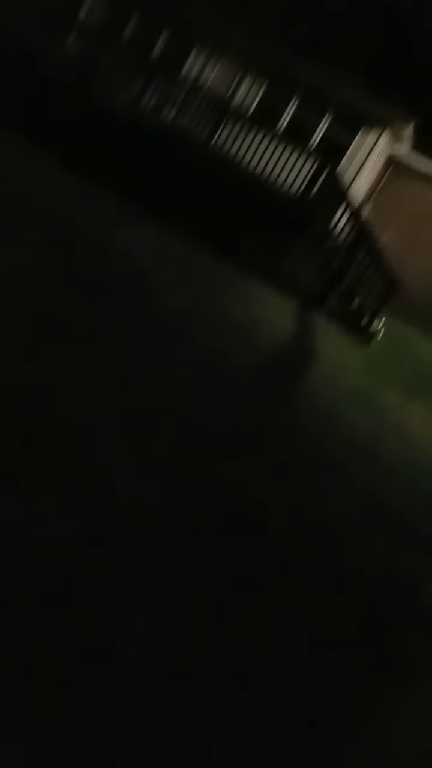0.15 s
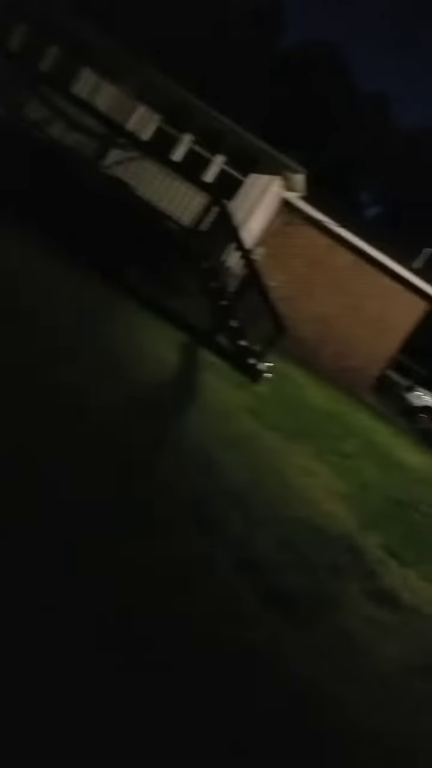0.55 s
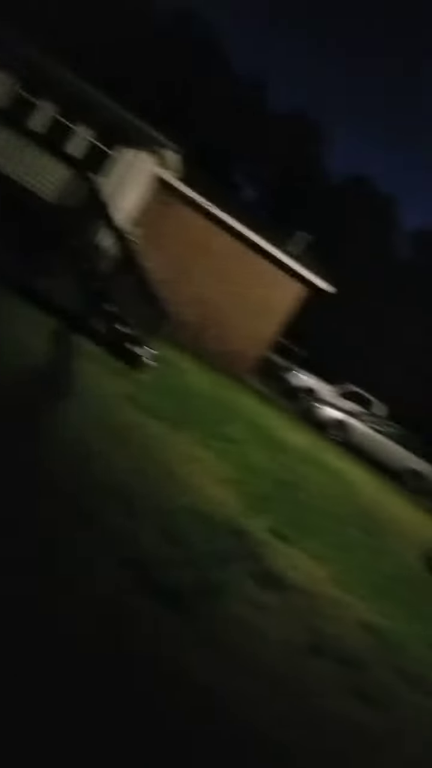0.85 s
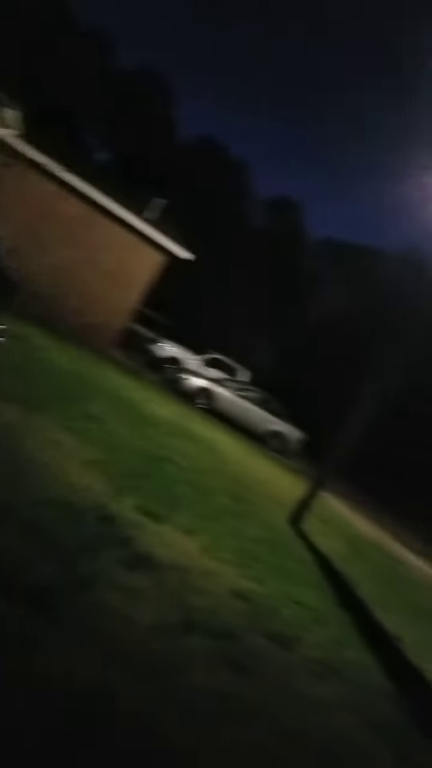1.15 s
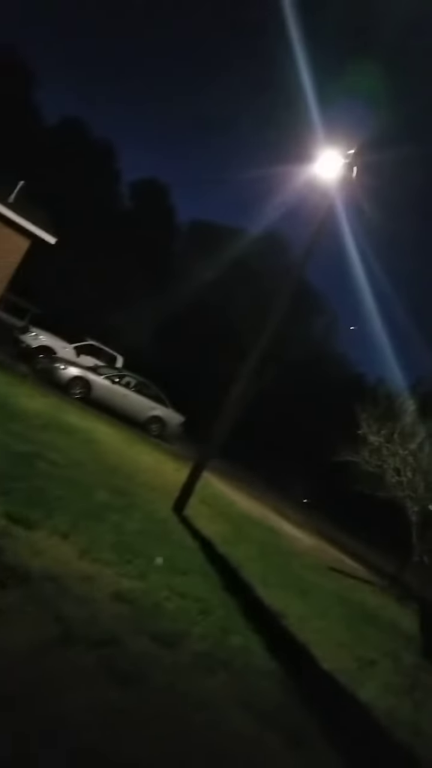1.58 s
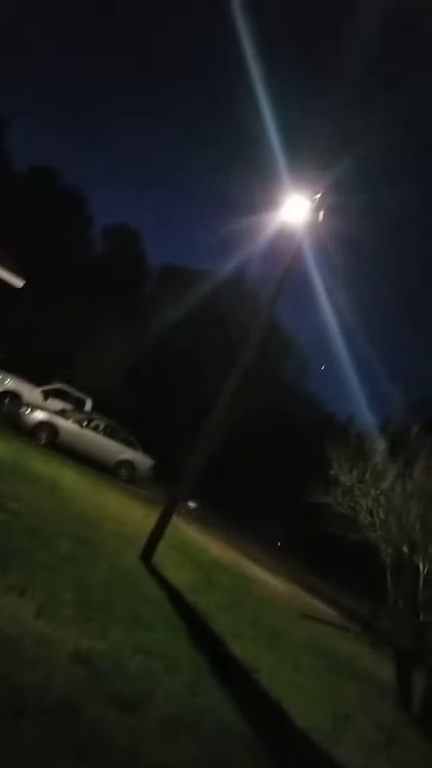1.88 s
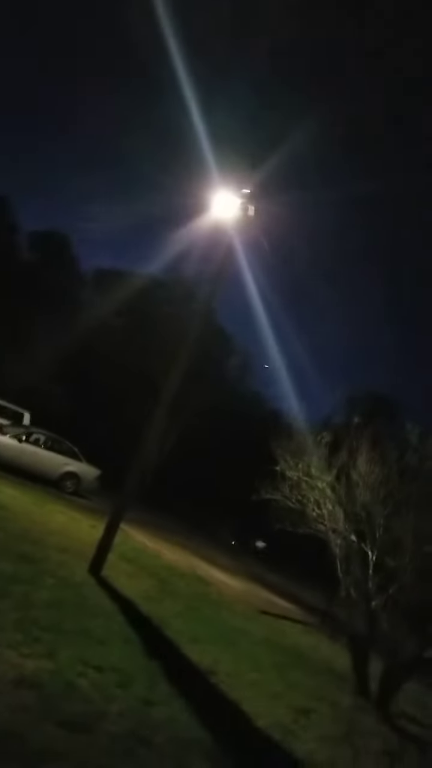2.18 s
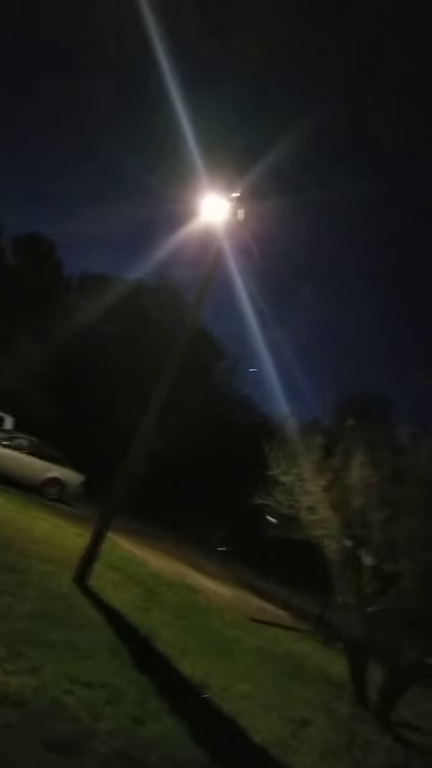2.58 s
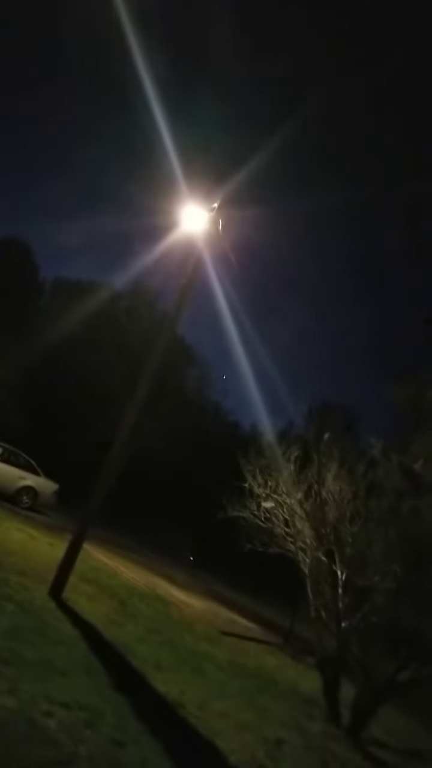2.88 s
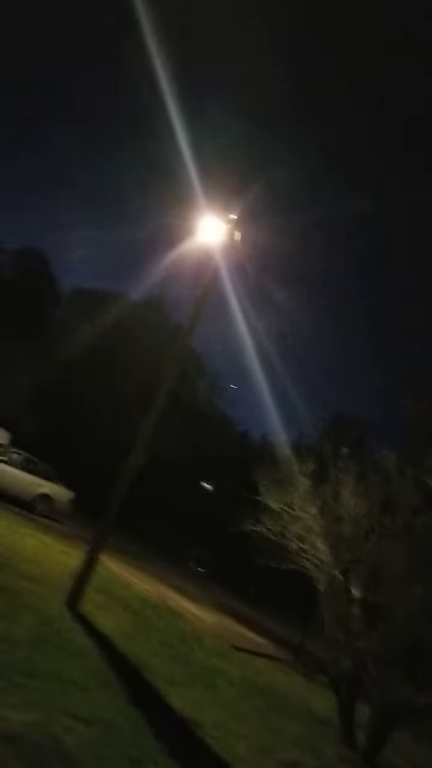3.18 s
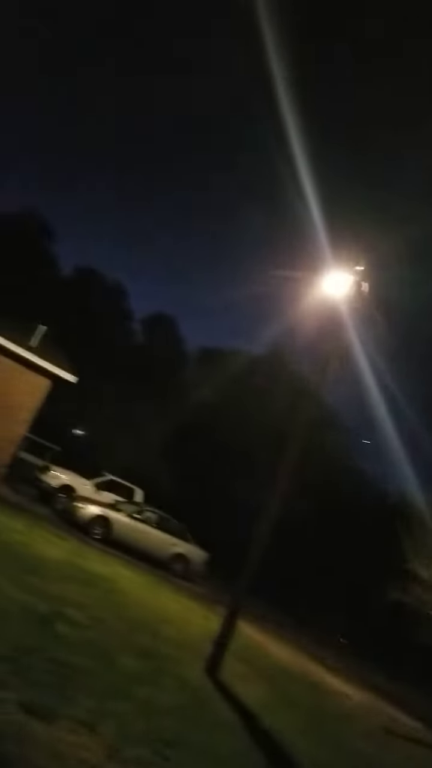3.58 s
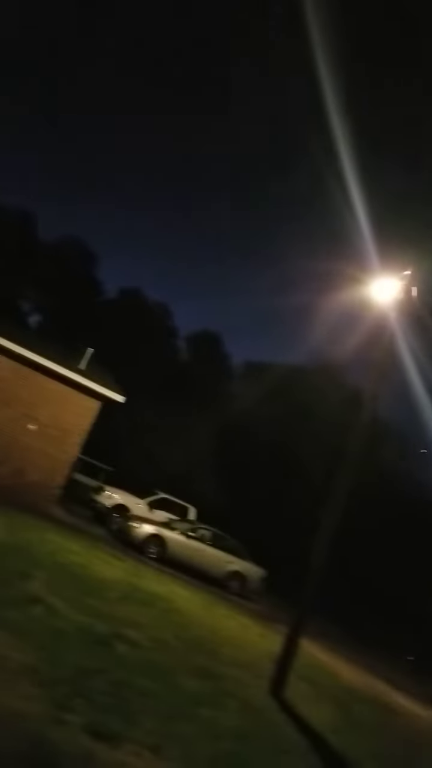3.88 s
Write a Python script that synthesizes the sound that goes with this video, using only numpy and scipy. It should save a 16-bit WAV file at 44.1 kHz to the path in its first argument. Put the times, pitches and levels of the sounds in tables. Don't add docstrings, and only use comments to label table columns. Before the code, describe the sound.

Four pure, gliding nightjar songs ring over a grassy yard beside a house, each trailing echoes into the next. Close cloth rubbing, taps and dull bumps on the swung phone crowd the first half, then thin out. Distant traffic and a hidden engine idle underneath. Near the end a far frog peeps weakly and another bird answers with a short note.

```python
import sys
import numpy as np
from scipy import signal
from scipy.fft import rfft, irfft, next_fast_len
from scipy.io import wavfile
from scipy.ndimage import uniform_filter1d, map_coordinates

SR = 44100
rng = np.random.default_rng(int(sys.argv[2]) if len(sys.argv) > 2 else 0)


def nominal_scale(level):
    x = np.asarray(level, float) / 20
    return 10 ** x


def persist_wave(psi):
    counts = np.round(np.clip(psi, -1, 1) * 32767).astype(np.int16)
    wavfile.write(sys.argv[1], SR, np.atleast_2d(counts).T)


N = 178252
LEAD_IN = 2 * SR


def along(points, hz):
    point_hz, value = np.transpose(points)
    return np.interp(np.log(hz + 1), np.log(point_hz + 1), value)


def curves(rows):
    s, *columns = np.transpose(rows)
    return [np.interp(np.arange(N) / SR, s, column) for column in columns]


def unit(x):
    return x / np.sqrt(np.mean(x ** 2) + 1e-20)


def wobble(rate_hz):
    knots = rng.standard_normal(int(N * rate_hz / SR) + 4)
    return map_coordinates(knots, [np.arange(N) * rate_hz / SR])


def filtered(x, response):
    m = next_fast_len(x.shape[-1] + 8192)
    spectrum = rfft(x, m) * response(np.fft.rfftfreq(m, 1 / SR))
    return irfft(spectrum, m)[..., :x.shape[-1]]


def sides(db):
    return np.array([nominal_scale(db / 2), nominal_scale(-db / 2)])


def add(track, x, start_s):
    part = track[:, LEAD_IN + round(start_s * SR):][:, :x.shape[1]]
    part += x[:, :part.shape[1]]


def rush(colour, alike, patchy_db):
    z = signal.stft(rng.standard_normal((2, N)), nperseg=512)[2]
    field = uniform_filter1d(rng.standard_normal(z.shape[1:]), size=6, axis=0)
    field = uniform_filter1d(field, size=10, axis=1)
    pair = signal.istft(z * nominal_scale(patchy_db * unit(field)), nperseg=512)[1][:, :N]

    def mid_side(hz):
        angle = np.arccos(np.clip(along(alike, hz), -1, 1)) / 2
        return nominal_scale(along(colour, hz)) * [np.cos(angle), np.sin(angle)]

    mid, side = filtered(pair, mid_side)
    return unit(np.array([mid + side, mid - side]))


def night():
    # s, level_db
    drone_level = [(0, -68), (.9, -65), (2.04, -65.5), (2.9, -70.5), (3.31, -67.5), (4.04, -71)]
    # hz, db_per_hz
    drone_colour = [(15, -47), (25, -19), (54, -4.5), (118, -4.5), (178, -11.5), (232, -13), (417, -24),
                    (525, -21.5), (753, -22), (1250, -23), (1620, -60), (2750, -120)]
    # hz, left-right likeness [0-1]
    drone_alike = [(60, 0.84), (130, 0.77), (300, 0.59), (700, 0.69), (1300, 0.3)]
    # hz, left_right_db
    drone_tilt = [(60, -0.5), (180, 0.5), (550, 6), (1650, -3), (4970, 0.0), (15000, 3)]
    # hz, db_per_hz
    hiss_colour = [(1940, -32), (3300, -0.5), (5750, 0.5), (6460, -2), (8070, -1.5), (8730, -4),
                   (9690, -3.5), (12300, 1.5), (15700, -2)]
    drone = rush(drone_colour, drone_alike, patchy_db=1.5)
    drone = filtered(drone, lambda hz: sides(along(drone_tilt, hz)))
    hiss = rush([(300, 5.2), (2000, 1.7)] + hiss_colour[1:], [(1000, 0)], patchy_db=-0.7)
    hiss_db = -74
    return nominal_scale(curves(drone_level)[0] + 7.5) * drone + nominal_scale(hiss_db) * hiss


def engine():
    # even_firing_db, gain_when_uneven_db
    orders = [
        (-56, -12),
        (-80, 19),
        (-62, -4),
        (-75, 14),
    ]
    # s, unevenness [0-1]
    unevenness = [(0, .3), (.17, .05), (.65, .95), (1.22, .9), (1.5, .65), (1.7, .6), (2.0, .05),
                  (2.7, .25), (3.15, .55), (3.3, .05), (4.04, .3)]
    firing_hz = 29.08
    turns = np.cumsum(firing_hz * (1 + .012 * wobble(3))) / SR
    uneven, = curves(unevenness)
    hum = np.zeros((2, N))
    for order, (even_db, gained_db) in enumerate(orders, start=2):
        drift_rad = 0.39 * wobble(7.9) + 0.3 * np.array([wobble(3.8), wobble(4.1)])
        level_db = even_db + gained_db * uneven + 2.03 * wobble(12)
        hum += nominal_scale(level_db) * np.sin(2 * np.pi * order * turns + drift_rad)
    return hum


def strokes():
    # top_s, top_db, rise_s, fall_s (both per 10 dB), left_right_db
    rustles = [(.02, -65, .1, .1, 2.2), (.07, -55, .008, .015, -9), (.15, -61.5, .06, .09, -2.5),
               (.34, -66, .08, .02, -3), (.45, -68.5, .2, .9, 2.2), (.9, -62, .12, .08, -6),
               (.99, -65, .015, .09, -6.5), (1.22, -67, .02, .13, -11), (1.39, -69, .04, .08, -9),
               (1.5, -70, .15, .11, -5.5), (1.82, -75, .08, .14, -11), (2.47, -77, .4, .2, -9),
               (3.27, -61.5, .12, .16, .8)]
    t = np.arange(N) / SR
    each = []
    for top_s, db, rise_s, fall_s, pan_db in rustles:
        drop_db = 10 * np.maximum((top_s - t) / rise_s, (t - top_s) / fall_s)
        each.append(nominal_scale(db - drop_db) * sides(pan_db)[:, None])
    return np.linalg.norm(each, axis=0)


def sleeve():
    # hz, db_per_hz
    cloth_colour = [(1940, -37), (3300, -7), (3860, -8), (4630, -4), (5560, -6.5), (6460, -3), (8120, -16),
                    (9440, -8.5), (11200, -7.5), (12100, -17.5), (14100, -19), (15000, -11.5), (15700, -12)]
    # hz, db_per_hz
    cloth_low = [(200, -3.5), (700, 2.5), (2000, 3)]
    # hz, left_right_db
    cloth_tilt = [(60, -11), (120, -6), (240, 0.0), (480, 2.0), (950, 1.5), (1890, 7.5), (3770, 15.5),
                  (7520, -7), (15000, -5.5)]
    fibres = nominal_scale(0.5 * wobble(29.25) + 1.4 * wobble(300))
    weave = rush(cloth_low + cloth_colour[1:], [(300, 1.0), (3000, 0.041)], patchy_db=2.6)
    weave = filtered(weave, lambda hz: sides(along(cloth_tilt, hz)))
    return nominal_scale(6.0) * strokes() * unit(fibres * weave)


def finger_clicks():
    # s, peak_db, ring_hz, tick_db, left_right_db
    clicks = [
        (0.0645, -27, 1330, -32, -16),
        (.0685, -49.5, 500, 6, -19),
        (.116, -46, 253, -24, -5),
        (0.1534, -45, 2500, -11, -3),
        (.683, -51.5, 900, -27, -25),
        (0.974, -64, 2480, 9, 0),
        (1.203, -49.5, 875, -18, -19),
        (1.2077, -34.5, 1300, -14, -16),
    ]
    t = np.arange(SR // 50) / SR
    track = np.zeros((2, N + LEAD_IN))
    for s, db, ring_hz, tick_db, pan_db in clicks:
        snap = 1.71 * np.sin(2 * np.pi * ring_hz * t) * nominal_scale(-16 * ring_hz * t)
        thud = 0.16 * np.sin(2 * np.pi * 270 * t) * nominal_scale(-60 * t / 0.028)
        grit = uniform_filter1d(rng.standard_normal(len(t)), size=5)
        tick = np.sin(2 * np.pi * 10700 * t) + grit
        tick *= nominal_scale(tick_db + 5 - 60 * t / 0.0039) * (1 - np.exp(-t / .0003))
        add(track, nominal_scale(db) * sides(pan_db)[:, None] * (snap + thud + tick), s)
    return track[:, LEAD_IN:]


def grip():
    # s, peak_db, left_right_db, pitch_hz
    bumps = [
        (0.07, -49, -21, 110),
        (0.578, -55, -22, 110),
        (0.778, -51, -20, 110),
        (0.889, -52, -21, 114),
        (1.029, -58, -14, 109),
        (1.277, -51, -26, 111),
        (1.449, -42.5, -20, 110),
        (1.628, -47, -10, 109),
        (1.88, -46, -26, 108),
        (3.449, -55, -31, 107),
    ]
    t = np.arange(SR // 10) / SR
    track = np.zeros((2, N + LEAD_IN))
    for s, db, pan_db, hz in bumps:
        push = np.sin(2 * np.pi * hz * t) * nominal_scale(-12 * hz * t) * (1 - np.exp(-t / 0.00043))
        add(track, nominal_scale(db - 2.5) * sides(pan_db)[:, None] * push, s)
    return track[:, LEAD_IN:]


def whistle(contour, t, db, warble_depth_hz=0):
    s, hz = np.transpose(contour)[:2]
    warble_hz = 79.9
    pitch_hz = np.interp(t, s, hz) + warble_depth_hz * np.cos(2 * np.pi * warble_hz * (t - .421))
    gate = np.clip(np.minimum((t - s[0]) / .0035, (s[-1] - t) / .008), 0, 1)
    return gate * nominal_scale(db + 3.5) * np.sin(2 * np.pi * np.cumsum(pitch_hz) / SR)


def scatter(t60_s, alike):
    # delay_s, level_db
    walls = [
        (0.051, -8.5),
        (0.073, -10.5),
        (0.109, -21.5),
        (.17, -25),
    ]
    t = np.arange(2 * SR) / SR
    shared, left, right = rng.standard_normal((3, len(t)))
    swell = nominal_scale(-60 * t / t60_s) + 1.15 * nominal_scale(-60 * t / .5)
    path = alike * shared + (1 - alike) * np.array([left, right])
    path = path * swell * np.clip(t / 0.015, 0, 1)
    path /= np.linalg.norm(path[0])
    for delay_s, db in walls:
        path[:, round((delay_s + rng.uniform(0, .004)) * SR)] += nominal_scale(db + rng.normal(0, 1.5, size=2))
    return path


def outdoors(direct, sung, t60_s, alike, lead_rad):
    # hz, db
    echo_colour = [(1350, 4.5), (1850, -4), (2100, -2.2), (2800, 1.3)]
    # hz, left_lead_rad
    port_lead = [(1300, 0.7), (2000, 2.47), (2800, 5.11), (3600, 4.4)]
    # hz, left_right_db
    port_tilt = [(1300, -1.5), (1700, -2), (2100, -8.5), (2800, -1.5), (3600, 1.5)]
    sent = filtered(sung, lambda hz: nominal_scale(along(echo_colour, hz)))
    here = signal.fftconvolve(sent[None], scatter(t60_s, alike), axes=1)
    there = signal.fftconvolve(sent[None], scatter(t60_s, alike), axes=1)
    swing_rad = 1.17 * wobble(12)[:here.shape[1]]
    sound = np.cos(swing_rad) * here + np.sin(swing_rad) * there
    sound[:, :len(sung)] += direct

    def ports(hz):
        half = np.exp(.5j * (along(port_lead, hz) + lead_rad))
        return sides(along(port_tilt, hz)) * [half, 1 / half]

    return filtered(sound, ports)


def nightjar():
    # start_s, echo_db, left_lead_rad
    songs = [
        (-1.73, -7, .1),
        (-.8, -3, .11),
        (.135, -3.5, .75),
        (1.063, -3.5, .55),
        (1.987, -3, .13),
        (2.928, -3.5, .089),
    ]
    # s_after_start, pitch_hz
    whip = [(0, 1570), (.006, 1625), (.03, 1755), (.055, 1840), (.075, 1860), (.108, 1775)]
    poor = [(.232, 1320), (.289, 1430), (.312, 1610), (.332, 1685), (.35, 1510), (.368, 1530), (.388, 1700),
            (.402, 1660)]
    will = [(.418, 1880), (.45, 2310), (.466, 2840), (.478, 2390), (.49, 2130), (.502, 2050), (.527, 1980),
            (.543, 1720)]
    # s_after_start, level_db
    effort = [(.01, -52.5), (.055, -42.5), (.1, -42), (.235, -66), (.3, -48.5), (.43, -42.5), (.466, -48.3),
              (.49, -40), (.54, -47)]
    # s_after_start, dip_db
    catches = [(.289, -7), (.345, -6), (.372, -4), (.408, -6)]
    # s, direct_gain_db, left_right_db
    facing = [(.2, -1.5, 8), (.45, -3, 3), (.525, 3, 2.2), (.63, -10, 4), (.665, .4, -7), (1.075, 3, -7),
              (1.13, -1.5, 3), (1.38, .4, 6), (1.46, 1.6, .3), (2.04, 2.6, -1.2), (2.26, 1.5, 6),
              (2.39, 1.5, .2), (2.5, 4, -1.2), (2.95, 4, -.4), (3.17, 1.2, 12), (3.26, 2.2, .2),
              (3.42, 6, -2.2), (3.46, -3, -1.2)]
    t = np.arange(SR * 6 // 10) / SR
    track = np.zeros((2, N + LEAD_IN))
    db = np.interp(t, *np.transpose(effort))
    for s, dip_db in catches:
        db = db + dip_db * np.clip(1 - abs(t - s) / .008, 0, 1)
    warble_depth_hz = 155 * np.interp(t, [.398, .418, .45, .466], [0, 1, 1, 0])
    sung = whistle(whip, t, db) + whistle(poor + will, t, db, warble_depth_hz)
    when_s, gain_db, pan_db = np.transpose(facing)
    for s, echo_db, lead_rad in songs:
        fading_db = 2.3 * wobble(59.4) + 2.4 * np.array([wobble(44.8), wobble(44.5)])
        gain = nominal_scale(np.interp(s + t, when_s, gain_db) + fading_db[:, :len(t)])
        gain = gain * sides(np.interp(s + t, when_s, pan_db))
        heard = outdoors(gain * sung, nominal_scale(echo_db) * sung, t60_s=2.81, alike=0.39, lead_rad=lead_rad)
        add(track, heard, s)
    return track[:, LEAD_IN:]


def far_callers():
    # start_s, level_db
    answers = [
        (.318, -53.5),
        (3.558, -50),
    ]
    # s_after_start, pitch_hz, level_db
    answer = [(0, 2580, -4), (.015, 2820, -1.5), (.031, 3140, -4), (.043, 2600, 2.5), (.064, 2080, -12)]
    # start_s, length_s, first_hz, last_hz, top_db
    pipes = [
        (3.01, .055, 3640, 3560, -75),
        (3.47, .05, 3420, 3480, -71),
        (3.52, .09, 3510, 3460, -70),
        (3.855, .04, 3720, 3320, -76),
    ]
    t = np.arange(SR // 3) / SR
    track = np.zeros((2, N + LEAD_IN))
    note = whistle(answer, t, np.interp(t, *np.transpose(answer)[::2]))
    calls = [(s, nominal_scale(db) * note, -6) for s, db in answers]
    for s, length_s, first_hz, last_hz, top_db in pipes:
        swell_db = top_db - 10 * abs(2 * t / length_s - 1)
        peep = whistle([(0, first_hz), (length_s, last_hz)], t, swell_db)
        calls.append((s, peep, -10.5))
    for s, call, echo_db in calls:
        direct = nominal_scale(2.2 * wobble(70)[:len(t)]) * call
        add(track, outdoors(direct, nominal_scale(echo_db) * call, t60_s=0.82, alike=0.3, lead_rad=0.13), s)
    return track[:, LEAD_IN:]


def scene():
    return night() + engine() + sleeve() + finger_clicks() + grip() + nightjar() + far_callers()


def low_pass(x):
    return signal.sosfilt(signal.butter(12, 15890, fs=SR, output="sos"), x)


def record(dry):
    return low_pass(dry)


dry = scene()
out = record(dry)
persist_wave(out)
```